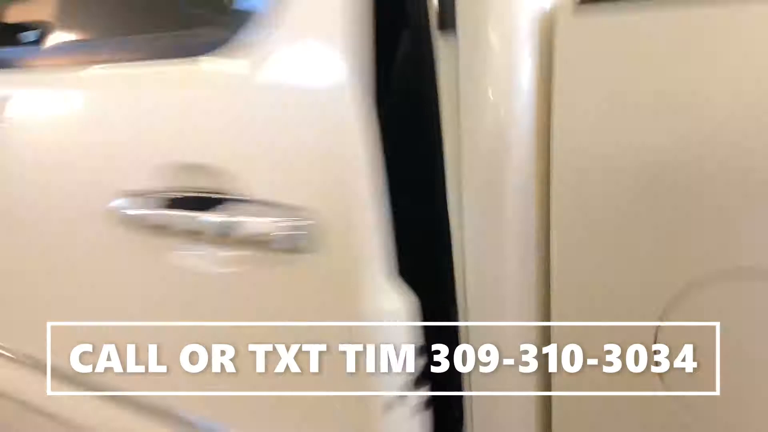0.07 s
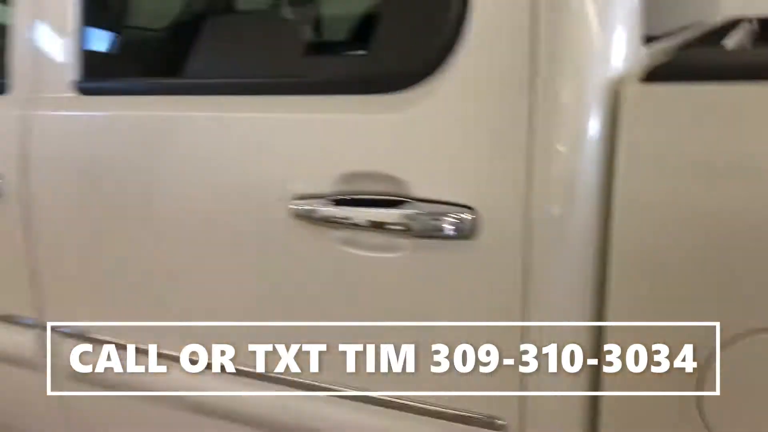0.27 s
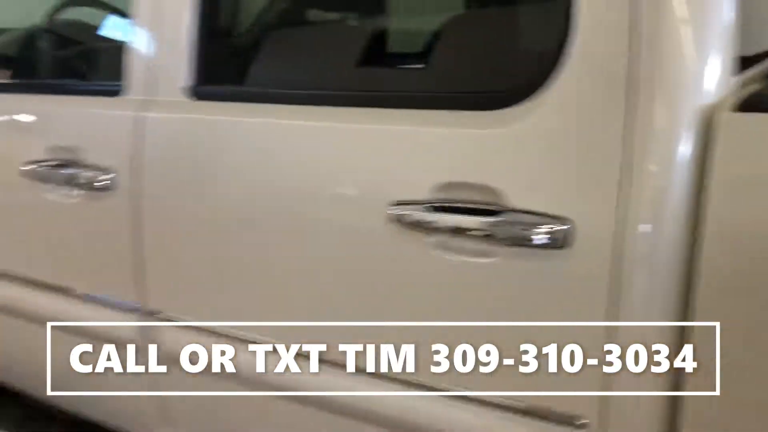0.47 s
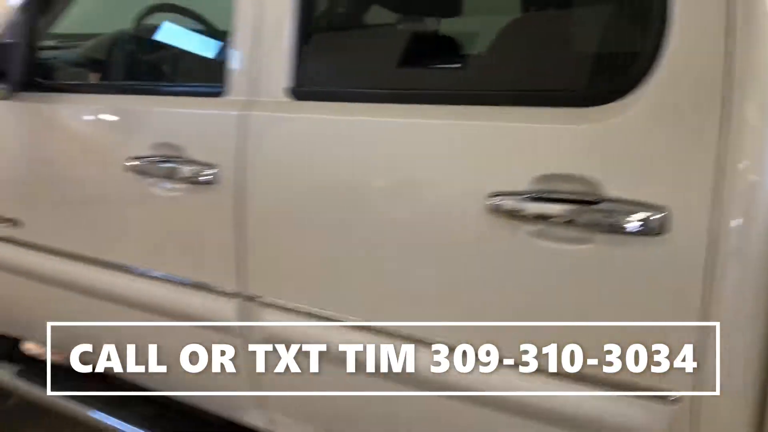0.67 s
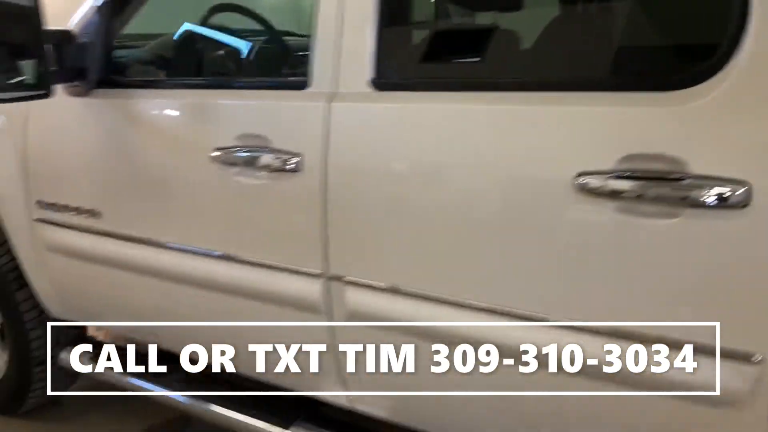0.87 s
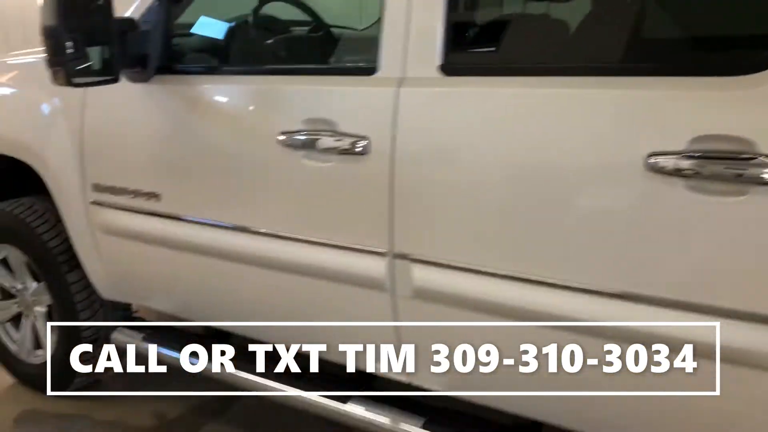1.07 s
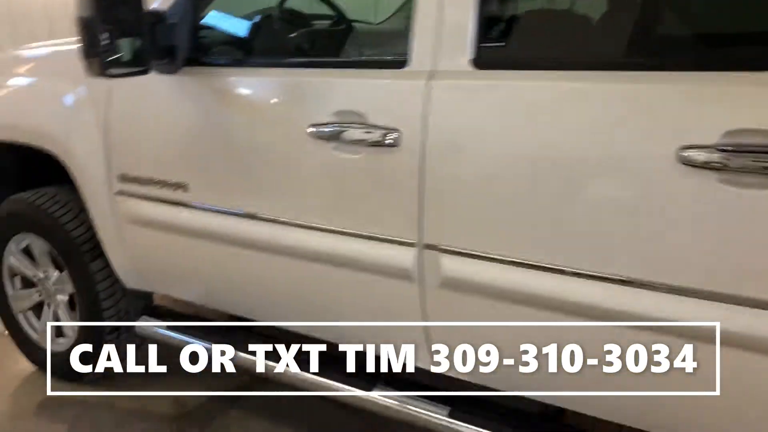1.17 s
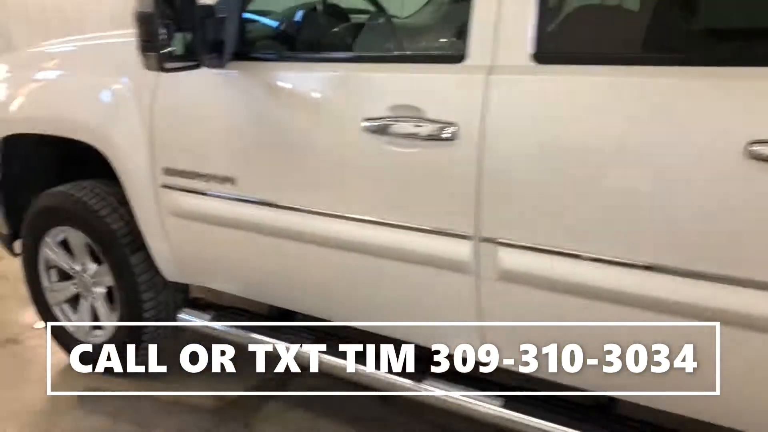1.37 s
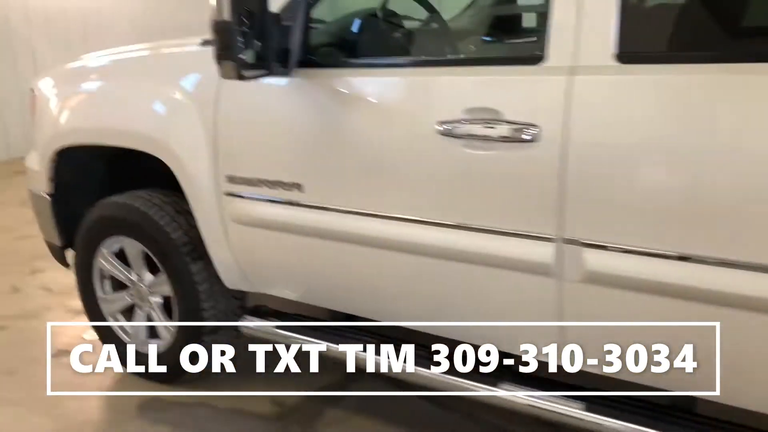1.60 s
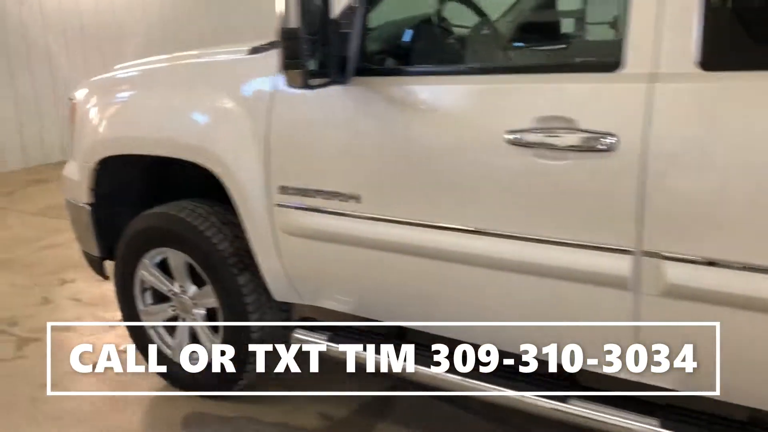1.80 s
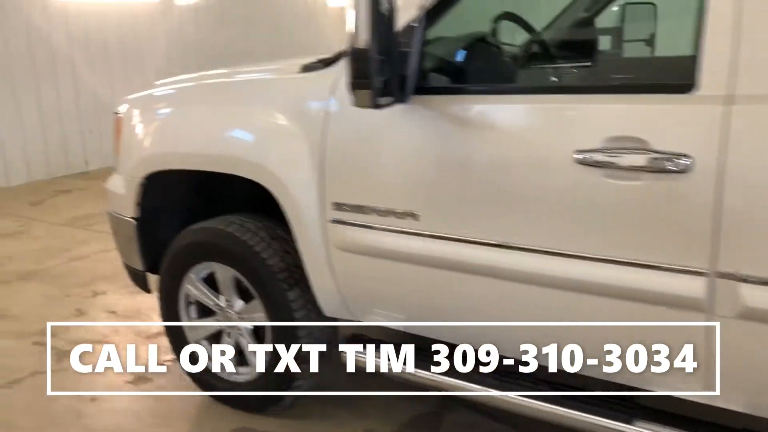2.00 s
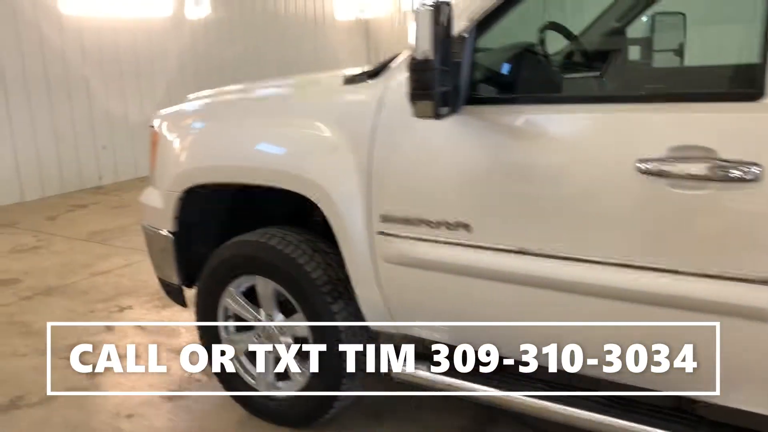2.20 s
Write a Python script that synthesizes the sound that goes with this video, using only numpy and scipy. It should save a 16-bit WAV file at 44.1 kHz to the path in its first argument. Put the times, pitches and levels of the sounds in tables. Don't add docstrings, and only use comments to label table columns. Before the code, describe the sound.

A pickup truck door slams hard up close, then echoes away through a large hard-walled garage.

```python
import sys
import numpy as np
from scipy import signal
from scipy.fft import rfft, irfft, next_fast_len
from scipy.io import wavfile
from scipy.ndimage import uniform_filter1d, map_coordinates

SR = 44100
rng = np.random.default_rng(int(sys.argv[2]) if len(sys.argv) > 2 else 0)


def unload_wav(signal):
    wavfile.write(
        sys.argv[1],
        SR,
        np.round(np.clip(np.atleast_2d(signal).T, -1, 1) * 32767).astype(np.int16),
    )


def to_linear_factor(level_db):
    exponent = np.asarray(level_db, float) / 20
    return 10 ** exponent


N = 99225
T = np.arange(N) / SR

# start in seconds, peak in dB, first and last pitch in Hz, T60 in seconds.
SKIN_THUDS = [(.2355, -12, 790, 770, .09), (.2393, -8, 400, 360, .04), (.2435, -4, 500, 490, .06),
              (.2485, 2, 270, 88, .055), (.2545, -12, 460, 440, .12), (.2612, -9.5, 330, 300, .11),
              (.2642, -10, 200, 140, .05), (.2716, -4, 230, 270, .055), (.2793, 1.5, 195, 70, .05),
              (.291, -6, 190, 100, .045), (.3015, -10, 210, 120, .05), (.31, -10, 120, 52, .12),
              (.333, -21, 70, 51, .3)]
# start in seconds, level in dB, rise and T60 in seconds, bright share 0-1.
METAL_CRACKS = [
    (.2352, -22, .002, .1, .25),
    (.2425, -9.5, .002, .05, 1),
    (.2465, -14, .002, .04, 1),
    (.268, -22, .004, .1, .6),
    (.277, -20, .001, .06, .6),
    (.292, -22, .0003, .035, .9),
    (.3146, -26, .0003, .05, .7),
]
# frequency in Hz, level in dB per Hz.
CRACK_BODY = [(350, -9.5), (600, -2.5), (800, -2), (1400, -12), (2300, -12.5), (4000, -16.5), (6500, -23.5)]
# frequency in Hz, level in dB per Hz.
CRACK_EDGE = [(4000, -51), (7000, -27), (11000, -32), (16000, -28.5)]
# start in seconds, peak in dB.
ROD_KNOCKS = [
    (.2921, -13.5),
    (.3146, -15.5),
    (.372, -25),
]
# frequency in Hz, level in dB, T60 in seconds.
ROD_MODES = [(1480, 0, .024), (1760, -4, .02), (2050, -9, .018), (2500, -13, .015), (3600, -16, .02),
             (4750, -18, .015)]
# frequency in Hz, level in dB per Hz.
CAB_SHUDDER = [(20, -18), (48, -10), (90, 1), (190, 1), (300, 3), (500, -10), (900, -31), (1500, -90)]
# frequency in Hz, T60 in seconds.
BAY_T60 = [(50, 0.53), (150, 1.09), (400, 2.39), (1000, 3.05), (2500, 2.84), (5000, 2.56), (9000, 0.84),
           (15000, 0.71)]
# frequency in Hz, level in dB.
BAY_COLOUR = [(50, -10), (150, -1), (300, 9), (550, 3), (1000, -4.5), (2500, -11.5), (5000, -24.5),
              (9000, -29), (15000, -30.5)]
# peak time, rise and fall in seconds, dull and bright level in dB.
SCUFFS = [(.0, .01, .1, -54, -72), (.14, .04, .05, -57, -68), (.175, .02, .02, -62, -70),
          (.935, .012, .12, -55, -69), (1.045, .015, .04, -64, -71), (1.33, .03, .06, -62, -74),
          (1.55, .05, .04, -70, -74), (1.635, .015, .07, -61, -78), (1.69, .03, .05, -61, -77),
          (1.74, .03, .06, -63, -80), (2.13, .01, .04, -68, -80)]
# frequency in Hz, level in dB per Hz.
SOLE_COLOUR = [(100, -22), (500, -8), (1300, -6), (2500, 0), (4200, -2), (6500, -11), (9000, -22),
               (13000, -45)]
# frequency in Hz, level in dB per Hz.
RUSTLE_COLOUR = [(3000, -26), (6000, 1), (10000, 6), (16000, 3)]
# start in seconds, peak in dB, frequency in Hz.
TICKS = [(.007, -53, 6500), (.012, -50, 2200), (.032, -54, 13000), (.048, -57, 12500), (.072, -51, 6500),
         (.136, -52, 8000), (.136, -56, 11000), (.643, -59, 13000), (.831, -58, 13000), (.837, -58, 13500),
         (2.004, -53, 3500), (2.004, -60, 7000), (2.004, -62, 14000), (2.047, -59, 14500),
         (2.058, -62, 13000), (2.058, -62, 8000), (2.092, -60, 9000), (2.1, -57, 11500), (2.1, -58, 14500),
         (2.101, -54, 4000), (2.102, -56, 7700), (2.111, -60, 14000), (2.128, -44, 650), (2.128, -49, 1500),
         (2.128, -54, 3000)]
# frequency in Hz, level in dB per Hz.
VENT_COLOUR = [(20, -36), (45, -9), (100, -2.5), (250, -7.5), (800, -11.5), (3000, -20.5), (6000, -35),
               (16000, -43)]
# centre and length in seconds, lowest lost frequency in Hz, depth in dB.
DROPOUTS = [
    (.434, .012, 4300, -17),
    (.594, .03, 3800, -40),
    (.797, .02, 3600, -17),
    (.902, .013, 3900, -22),
    (1.158, .016, 5100, -14),
    (1.35, .012, 4000, -14),
    (1.789, .03, 5300, -35),
    (1.852, .03, 4300, -35),
    (1.906, .011, 4200, -20),
]


def unit(x):
    return x / np.sqrt(np.mean(x ** 2) + 1e-20)


def along(points, hz):
    f, v = np.transpose(points)
    return np.interp(np.log(hz + 1), np.log(f + 1), v)


def noise(gain):
    m = next_fast_len(N + 8192)
    spectrum = rfft(rng.standard_normal(m)) * gain(np.fft.rfftfreq(m, 1 / SR))
    return unit(irfft(spectrum, m)[:N])


def coloured(points):
    return noise(lambda hz: to_linear_factor(along(points, hz)))


def wobble(rate):
    return map_coordinates(rng.standard_normal(int(N * rate / SR) + 4), [T * rate])


def struck(start, rise, t60):
    t = np.clip(T - start, 0, None)
    return t, (1 - np.exp(-t / max(rise, 1e-5))) * to_linear_factor(-60 * t / t60)


def ring(start, db, hz, t60, rise):
    t, shape = struck(start, rise, t60)
    return to_linear_factor(db) * shape * np.sin(2 * np.pi * hz * t)


def skin_thuds():
    sag_s, swell_s = .005, .001
    out = np.zeros(N)
    for start, db, first_hz, last_hz, t60 in SKIN_THUDS:
        t, shape = struck(start, swell_s, t60)
        turns = last_hz * t + (first_hz - last_hz) * sag_s * (1 - np.exp(-t / sag_s))
        out += to_linear_factor(db) * shape * np.sin(2 * np.pi * turns)
    return out


def metal_cracks():
    body = coloured(CRACK_BODY + [(12000, -60)])
    edge = to_linear_factor(-9) * coloured(CRACK_EDGE)
    grit = to_linear_factor(1.2 * wobble(1100))
    out = np.zeros(N)
    for start, db, rise, t60, bright in METAL_CRACKS:
        shape = struck(start, rise, t60)[1]
        out += to_linear_factor(db) * shape * (body + bright * edge)
    return grit * out


def rod_rattles():
    out = np.zeros(N)
    for start, db in ROD_KNOCKS:
        for hz, level, t60 in ROD_MODES:
            out += ring(start, db + level + rng.normal(0, 2), hz, t60, rise=.0003)
    return out


def seal_squeeze():
    peak_s, rise_s, level_db, seal_hz = .23, .019, -34, 386
    squeeze = np.exp(-np.abs(T - peak_s) / rise_s)
    breath = noise(lambda f: 1 / (1 + ((f - seal_hz) / 70) ** 2) + .18 / (1 + (f / 1200) ** 2) * (f > 200))
    return to_linear_factor(level_db) * squeeze * breath


def cab_shudder():
    shape = struck(.3, .0067, t60=.85)[1]
    return to_linear_factor(-21.5) * shape * coloured(CAB_SHUDDER)


def door():
    return skin_thuds() + metal_cracks() + rod_rattles() + seal_squeeze() + cab_shudder()


def bay():
    level_db, delay_s, rise_s = 13, .25, .028
    hz, t, z = signal.stft(rng.standard_normal(N), SR, nperseg=256)
    decay_db = along(BAY_COLOUR, hz)[:, None] - 60 * t / along(BAY_T60, hz)[:, None]
    shape = to_linear_factor(decay_db) * (1 - np.exp(-t / rise_s))
    tail = signal.istft(z * shape, SR, nperseg=256)[1]
    tail = tail / np.linalg.norm(tail)
    return to_linear_factor(level_db) * np.pad(tail, (int(delay_s * SR), 0))[:N]


def swing():
    level_db, corner_hz, fade_s = -51, 45, .086
    air = noise(lambda f: 1 / (1 + (f / corner_hz) ** 4) * (f > 22) + .23 / (1 + (f / 250) ** 4))
    return to_linear_factor(level_db) * np.exp(-(T / fade_s) ** 2) * air


def scuffs():
    dull, bright = np.zeros(N), np.zeros(N)
    for peak, rise, fall, dull_db, bright_db in SCUFFS:
        swell = np.exp(-np.where(T < peak, (peak - T) / rise, (T - peak) / fall))
        dull += to_linear_factor(dull_db) * swell
        bright += to_linear_factor(bright_db) * swell
    grain = to_linear_factor(2.5 * wobble(150))
    return grain * (dull * coloured(SOLE_COLOUR) + bright * coloured(RUSTLE_COLOUR))


def ticks():
    out = np.zeros(N)
    for start, db, hz in TICKS:
        t60 = min(18 / hz + .002, .008)
        out += ring(start, db + 5, hz, t60, rise=.0001)
    return out


def soft_step():
    return ring(2.1, -44, hz=205, t60=.18, rise=.00376)


def room_tone():
    fan_hz, fan_width_hz = 221.4, 30
    fan = noise(lambda f: 1 / (1 + ((f - fan_hz) / fan_width_hz) ** 2))
    rush = to_linear_factor(-56 + .8 * wobble(6)) * coloured(VENT_COLOUR)
    return rush + to_linear_factor(-62 + 1.5 * wobble(4)) * fan


def scene():
    return (door() + bay() + swing() + scuffs() + ticks() + soft_step() + room_tone())[None]


def soft_ceiling(x):
    return x / (1 + np.abs(x) ** 8) ** (1 / 8)


def thin_dropouts(x):
    hz, t, z = signal.stft(x, SR, nperseg=2048)
    depth_db = sum(db * (np.abs(t - centre) < .017) for centre, _, _, db in DROPOUTS) * (hz[:, None] > 1400)
    weak = np.abs(z) < 1.5 * uniform_filter1d(np.abs(z), size=31, axis=1)
    share = np.where(weak, .65, -.12)
    return signal.istft(z * to_linear_factor(depth_db * share) * (hz[:, None] < 16150), SR, nperseg=2048)[1]


def lose_treble(x):
    hz, t, z = signal.stft(x, SR, nperseg=256)
    loss_db = 0
    for centre, length, low_hz, db in DROPOUTS:
        dip = np.clip(2 - 4 * np.abs(t - centre) / length, 0, 1)
        loss_db = loss_db + db * (hz[:, None] > low_hz) * dip
    return signal.istft(z * to_linear_factor(loss_db), SR, nperseg=256)[1][:, :N]


def top_cut(x):
    return signal.sosfilt(signal.butter(12, 16810, fs=SR, output="sos"), x)


def record(dry):
    mix = lose_treble(thin_dropouts(soft_ceiling(dry)))
    return top_cut(mix)


dry = scene()
out = record(dry)
unload_wav(out)
```